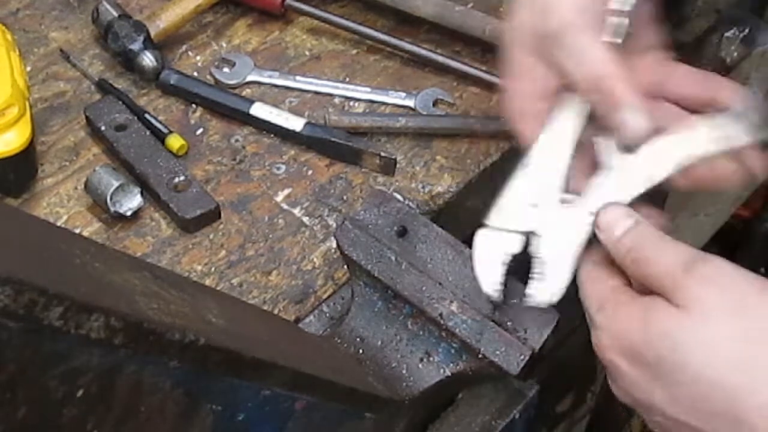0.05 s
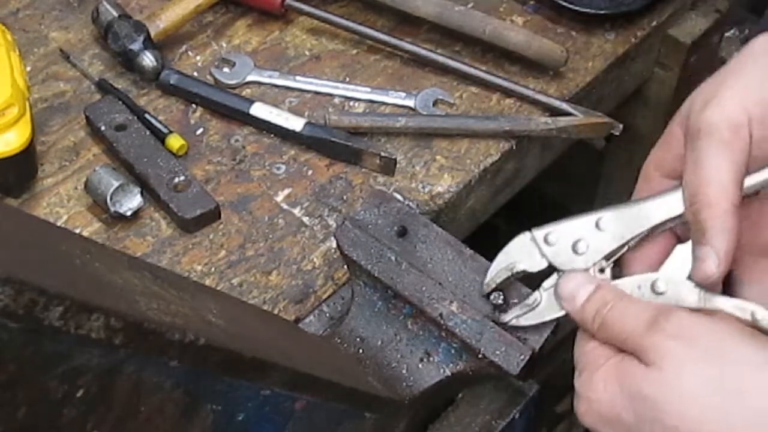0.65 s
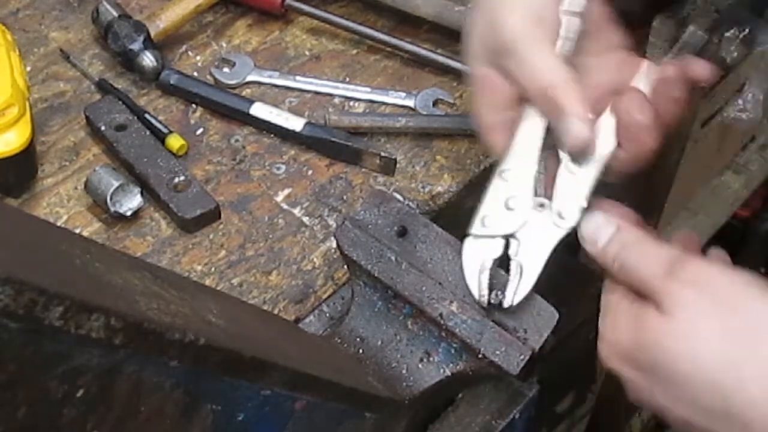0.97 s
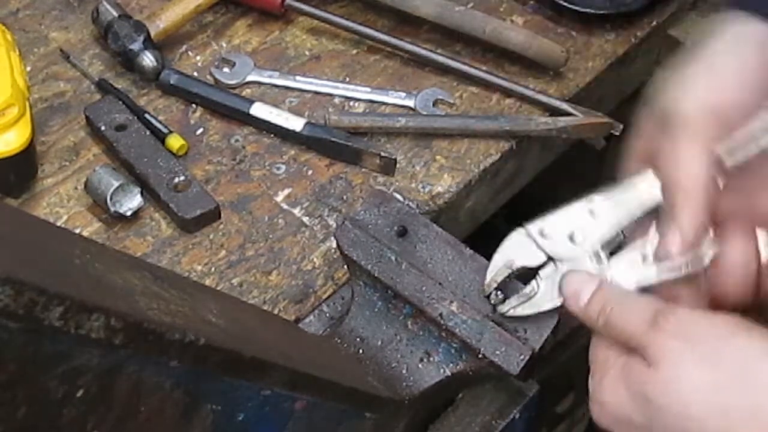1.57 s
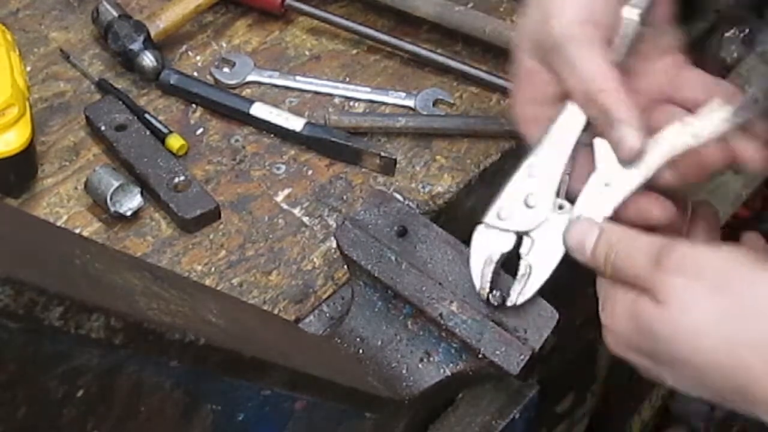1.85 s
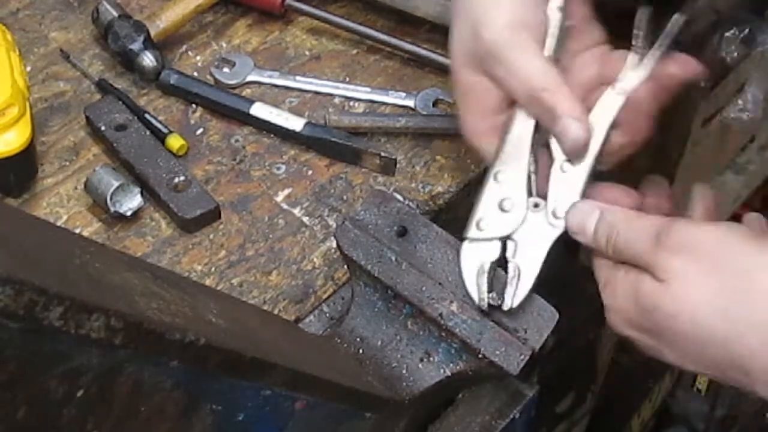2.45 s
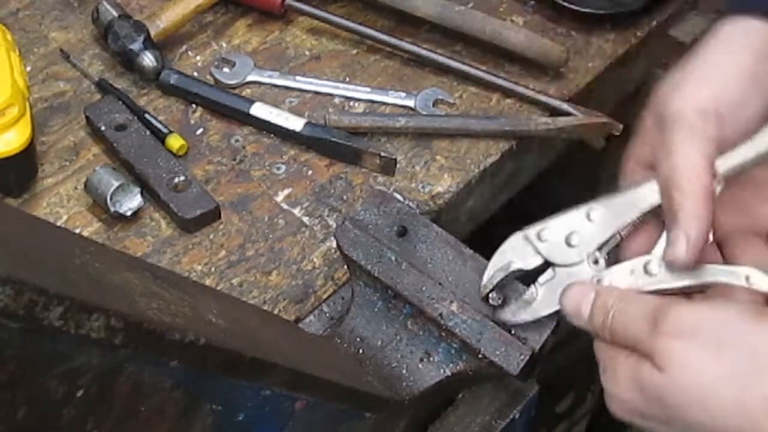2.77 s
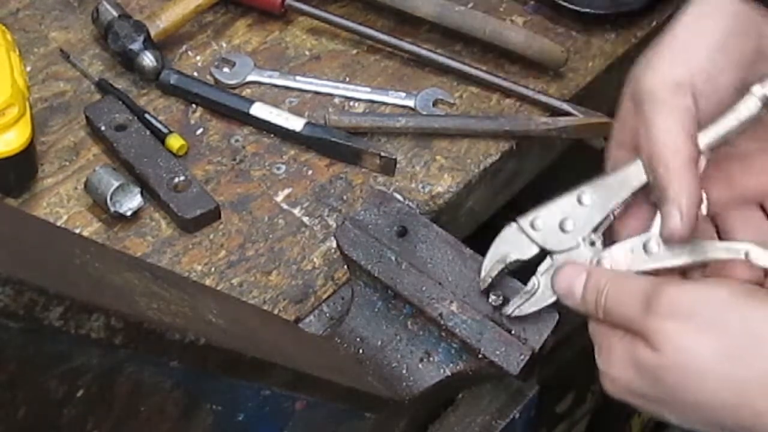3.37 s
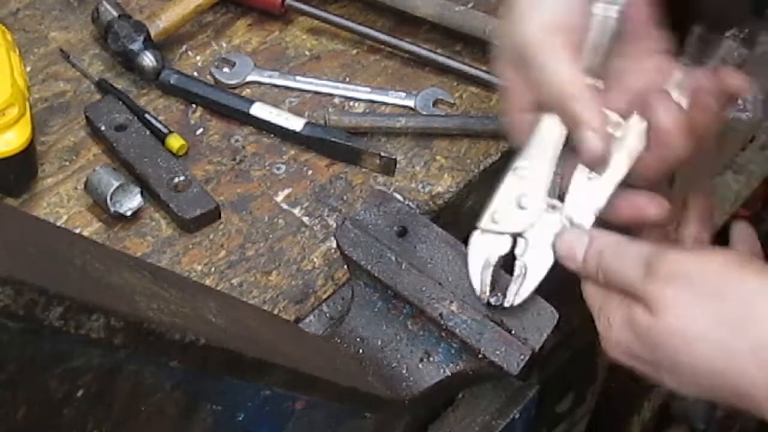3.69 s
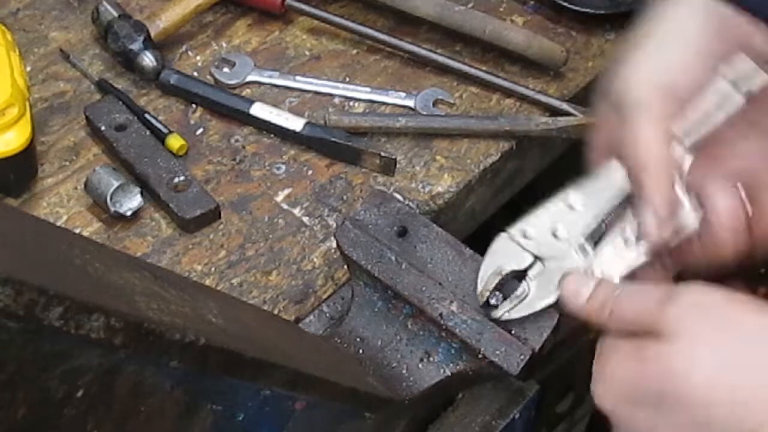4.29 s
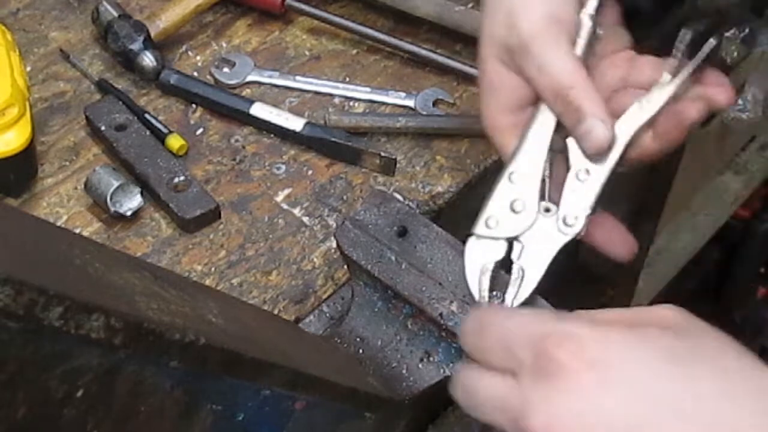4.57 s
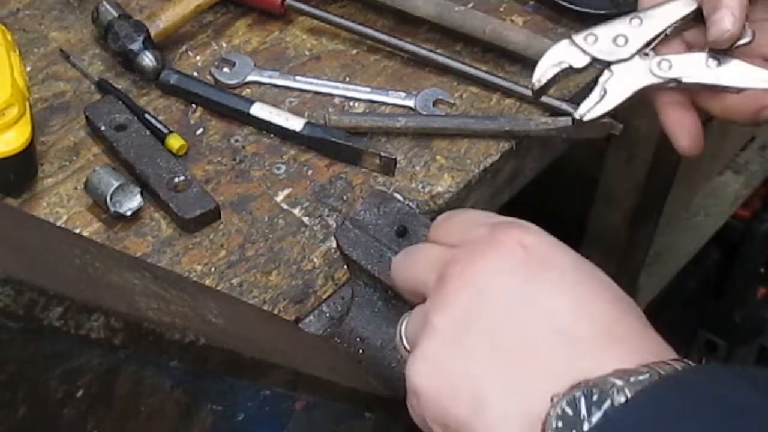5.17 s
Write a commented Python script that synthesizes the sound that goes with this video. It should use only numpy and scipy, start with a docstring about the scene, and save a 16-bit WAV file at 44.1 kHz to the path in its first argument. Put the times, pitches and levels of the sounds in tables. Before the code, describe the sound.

Steel locking pliers work a broken screw stub held in an iron vice, close to the microphone in a small workshop. The loose lever clicks at the end of each stroke and the jaws clack as they are reset, with faint scraping and dull knocks through the wooden bench. A few very faint squeaks come late, then a sharp ringing snap and a last click give way to quiet room tone.

```python
"""Locking pliers work a broken screw stub out of a cast-iron vice, close to a camera microphone in a
small workshop. Each stroke ends in a click of the loose lever; then the jaws are set again and the
toggle snaps. The teeth scrape over the stub, the vice knocks on the wooden bench, and the steel
squeaks faintly as it turns. The camera's gain control ducks at the loudest, sharpest clicks and lets
the room noise swell back."""
import sys
import numpy as np
from scipy import signal
from scipy.fft import rfft, irfft
from scipy.io import wavfile
from scipy.ndimage import uniform_filter1d

SR = 44100
rng = np.random.default_rng(int(sys.argv[2]) if len(sys.argv) > 2 else 0)


def to_wav(sig):
    """Store sig (one row per channel, or 1-D mono) as 16-bit WAV at the path in sys.argv[1].

    Samples outside -1..1 are clipped; the rate is SR.
    """
    pcm = np.clip(np.atleast_2d(sig), -1, 1) * 32767
    pcm = np.round(pcm).astype(np.int16)
    wavfile.write(sys.argv[1], SR, pcm.T)  # frames by channels


N = 239594
T = np.arange(int(.36 * SR)) / SR  # time within one impact [s]

# the pliers reach the end of a turn and the lever drops loose: (time [s], level [dB])
STROKE_ENDS = [(0.134, -23.5), (0.9556, -27), (1.6972, -29), (2.3718, -28.5), (3.0579, -22), (3.7305, -27),
               (4.415, -26.5)]
# shoves that reach the bench through the vice: (time [s], level [dB], tilt [dB/octave])
SHOVES = [(0.014, -43, -3.5), (0.225, -38, 1), (0.569, -30.5, -3), (0.589, -31.5, -1), (0.921, -36.5, 1),
          (1.125, -36.5, -4), (1.216, -29, -2.5), (1.262, -37.5, -3), (1.393, -39.5, -9.5),
          (1.43, -30, 0.5), (1.855, -42.5, -7.5), (1.968, -44, -8), (2.111, -30.5, -0.5), (2.367, -38.5, 1),
          (2.542, -38.5, -5), (2.59, -35.5, 11.5), (2.67, -25, -2.5), (2.826, -23.5, 2), (3.025, -40, 5.5),
          (3.196, -40.5, -2.5), (3.228, -41, -6), (3.284, -33.5, 7), (3.471, -30, -1), (3.856, -43, -4.5),
          (4.02, -32.5, -4.5), (4.137, -45, -1.5), (4.228, -31, 1.5), (4.581, -33.5, -4.5),
          (4.595, -30.5, -7), (4.716, -36, -4.5)]


def pliers(stroke_hz=6590, touch_hz=3560, touch_db=-7.5, rebound_db=-18):
    """The pliers click as the jaws are set, as a stroke ends and, more dully, as a shove begins."""
    # steel meets steel as the jaws are set again: (time [s], level [dB], contact centre [Hz])
    jaw_clicks = [(0.017, -40, 3960), (0.024, -35, 2800), (0.117, -44.5, 5300), (0.742, -34, 5130),
                  (0.7542, -11.5, 2290), (0.7569, -14.5, 6950), (0.78, -24.5, 6360), (1.171, -39, 5500),
                  (1.2158, -27.5, 3600), (1.3373, -32.5, 6850), (1.397, -33, 2800), (1.4052, -35, 5030),
                  (1.43, -32.5, 3650), (1.5757, -39, 4870), (1.933, -44, 4100), (2.09, -22, 6300),
                  (2.12, -27, 4630), (2.161, -34.5, 5000), (2.4346, -38, 5500), (2.5434, -30, 3060),
                  (2.5912, -30.5, 1980), (2.624, -37.5, 3940), (2.64, -42, 5200), (2.67, -19, 3800),
                  (2.7402, -28, 6450), (2.768, -33, 6270), (2.8294, -17.5, 3540), (2.844, -38, 5230),
                  (2.8876, -21.5, 6160), (2.8922, -28, 5700), (3.033, -33, 4940), (3.2355, -39, 6040),
                  (3.265, -41, 5500), (3.287, -34, 2500), (3.424, -39.5, 6000), (3.4527, -19, 7200),
                  (3.4722, -27.5, 4400), (3.7982, -41, 5300), (3.871, -35, 3740), (3.954, -43, 5200),
                  (4.022, -35, 2980), (4.102, -38.5, 6130), (4.2135, -16, 7160), (4.2353, -19.5, 5700),
                  (4.248, -23, 6270), (4.2881, -16, 7100), (4.7125, -30.5, 5200), (4.7467, -34, 5660),
                  (4.8265, -24.5, 7000), (4.849, -21, 5150), (4.855, -16.5, 4700), (4.8613, -6.5, 8200),
                  (4.9847, -23, 6750)]
    contacts = [(s, click(db, hz)) for s, db, hz in jaw_clicks]
    contacts += [(s, click(db, stroke_hz, ring_db=-7.5)) for s, db in STROKE_ENDS]
    contacts += [(s, click(db + touch_db, touch_hz)) for s, db, _ in SHOVES]
    out = np.zeros(N)
    for s, sound in contacts:
        add(out, s, sound)
        rebound_s = .015 + .04 * rng.random()  # play in the joints
        add(out, s + rebound_s, undb(rebound_db) * sound)
    return out


def click(db, hz, ring_db=-10, neutral_hz=6700, spread=1.588):
    """A short crack of contact and its ring; the harder the contact, the brighter both."""
    crack = unit(burst(hz, spread, t60=.0083), .002)
    tilt_db = 9.5 * np.log2(hz / neutral_hz)
    return undb(db) * (crack + undb(ring_db) * steel_ring(tilt_db))


def steel_ring(tilt_db, modes_db=0, room_db=-7, pivot_hz=3000):
    """Steel modes, struck at a new spot each time, in a wash of reflections from bench and walls."""
    # modes of pliers and vice: (frequency [Hz], level [dB], t60 [s])
    steel_modes = [(1222, -3, 0.066), (1488, -3, 0.052), (2140, -6, 0.094), (2586, -5, 0.11),
                   (2661, -2.5, 0.085), (3210, -7.5, 0.1), (3740, -18, 0.14), (3760, -8.5, 0.11),
                   (4700, -39, .13), (4570, 1, 0.028), (5330, 4.5, 0.062), (5770, 1, 0.062),
                   (5900, -19, 0.14), (7000, -37, .14), (7510, -2, 0.1), (9240, -5, 0.11),
                   (11500, -27, .08), (14500, -9, 0.11)]
    # broad spectrum of the wash: (frequency [Hz], level [dB])
    clatter = [(150, -25), (600, 1.5), (1500, -6.5), (2700, 1.5), (4000, -1), (5500, -1), (9000, -2.5),
               (10500, -7.5), (13000, -11), (14400, -12), (16000, -38)]
    # clusters of close, quickly damped modes in the pliers: (frequency [Hz], width [Hz], gain [dB])
    clusters = [(2600, 270, -0.5), (4960, 250, 7), (8700, 260, 7), (14350, 400, 1)]
    hz, db, t60 = np.transpose(steel_modes)
    strength, detune, phase = rng.standard_normal((len(hz), 3)).T
    hz = hz * (1 + .002 * detune)
    # a soft touch leaves the high modes quiet
    gain = undb(db + 2.5 * strength + min(tilt_db, 0) * np.log2(np.maximum(hz / pivot_hz, 1)))
    modes = sum(g * fade(d) * np.sin(2 * np.pi * f * T + np.pi * p)
                for g, d, f, p in zip(gain, t60, hz, phase))
    colour = [(f, level + tilt_db * np.log2(max(f / pivot_hz, 1))) for f, level in clatter]
    wash = noise(len(T), colour, peaks=clusters) * (fade(.14) + undb(room_db) * fade(.13))
    return unit(unit(wash, .022) + undb(modes_db) * unit(modes, .022), .022)


def toggle_snaps(t60=.023, width_octaves=.59):
    """The toggle strikes the lever and rings the modes near the centre frequency of the blow."""
    # the toggle snaps over: (time [s], level [dB], centre [Hz])
    blows = [(0.754, -12.5, 2420), (4.747, -34, 4500), (4.826, -30, 3470), (4.849, -18.5, 5100)]
    # modes of the lever, damped by the hand: (frequency [Hz], level [dB])
    lever_modes = [(1410, -5), (2000, -0.5), (2300, -1.5), (3110, -4.5), (3370, -10), (3900, 5.5),
                   (4840, 2.5)]
    out = np.zeros(N)
    for s, db, centre_hz in blows:
        for hz, mode_db in lever_modes:
            share = np.exp(-.5 * (np.log2(hz / centre_hz) / width_octaves) ** 2)
            add(out, s, undb(db + mode_db) * share * fade(t60) * np.sin(2 * np.pi * hz * T))
    return out


def pings(t60=.11):
    """Lone partials of jaw, lever and spring sing on after a blow."""
    # struck partials: (time [s], frequency [Hz], level [dB])
    partials = [(0.758, 14350, -29), (0.759, 5320, -23.5), (2.12, 9240, -35.5), (2.641, 7940, -48),
                (2.676, 9380, -29.5), (2.83, 3130, -29), (2.829, 6150, -29), (2.829, 14260, -32.5),
                (2.891, 5290, -32.5), (3.286, 1440, -26), (3.287, 1866, -29.5), (3.285, 3200, -31.5),
                (3.731, 4880, -37), (4.418, 2620, -28), (4.828, 7750, -33), (4.8545, 3470, -11.5)]
    out = np.zeros(N)
    for s, hz, db in partials:
        add(out, s, undb(db) * fade(t60) * np.sin(2 * np.pi * hz * T))
    return out


def scraping(slips_per_s=160, spread_db=4):
    """Teeth slip over the stub in tiny uneven steps, each ringing the steel."""
    # drags of the jaws: (time [s], length [s], level [dB])
    drags = [(0.579, 0.11, -65), (1.106, 0.25, -54), (1.682, 0.017, -45.5), (1.833, 0.41, -59.5),
             (2.588, 0.18, -52), (2.802, 0.062, -36), (3.189, 0.17, -54), (3.833, 0.46, -56.5)]
    out = np.zeros(N)
    for s, length, db in drags:
        size = int(length * SR)
        slips = rng.random(N) < slips_per_s / SR
        strength = undb(spread_db * np.minimum(rng.exponential(size=N), 4))
        force = (slips * strength)[:size] * np.sin(np.linspace(0, np.pi, size))
        rasp = signal.fftconvolve(force, steel_ring(tilt_db=-7, modes_db=-7.5))
        add(out, s, undb(db) * unit(rasp, length))
    return out


def bench_knocks(stroke_db=-23, stroke_tilt_db=6.5, room_db=-12, rise_s=.00069):
    """Knocks spread through the bench top as bending waves: the highs arrive first, the lows trail."""
    # broad response of the wood: (frequency [Hz], level [dB])
    wood = [(50, -33), (120, -13), (250, -8.5), (550, -4), (850, -6.5), (1350, -2), (1700, -16.5),
            (2800, -19.5), (4200, -38), (9000, -76)]
    # resonances of the bench with the vice on it: (frequency [Hz], width [Hz], gain [dB])
    resonances = [(150, 8.5, -1), (247.4, 21.3, 16), (384, 23, 10.5), (404, 31, 7), (553.7, 19.3, 19),
                  (608, 22, 13), (798.7, 47, 18), (896, 116, 8.5), (1309, 27, 9.5), (1481, 38, 12.5),
                  (1903, 180, 13), (2583, 37, 17.5)]
    size = 2 * len(T)
    khz = np.fft.rfftfreq(size, 1 / SR) / 1000
    lag_s = .006 * np.maximum(np.maximum(khz, .15) ** -.5 - .5, 0)
    dispersion = np.exp(-2j * np.pi * np.cumsum(lag_s) * SR / size)
    envelope = (fade(.14) + undb(room_db) * fade(.32)) * (1 - np.exp(-T / rise_s))
    stroke_knocks = [(s, db + stroke_db, stroke_tilt_db) for s, db in STROKE_ENDS]
    out = np.zeros(N)
    for s, db, tilt_db in list(SHOVES) + stroke_knocks:
        thud = noise(len(T), wood, tilt_db, resonances) * envelope
        knock = irfft(rfft(thud, size) * dispersion)
        add(out, s, undb(db) * unit(knock, .04))
    return out


def bench_sway(sway_db=-30.5):
    """The whole bench sways briefly on its legs at the end of each stroke."""
    out = np.zeros(N)
    for s, db in STROKE_ENDS:
        boom = burst(hz=78, spread=1.1, t60=.1)
        add(out, s, undb(db + sway_db) * unit(boom, .08))
    return out


def squeaks(waver=.0058):
    """A thin stick-slip whistle that sinks as the turn slows."""
    # dry steel turning under load: (time [s], length [s], start [Hz], end [Hz], level [dB])
    turns = [(3.748, 0.14, 7150, 7000, -63), (3.945, 0.13, 7240, 6900, -62),
             (4.123, .09, 7100, 6700, -61.5), (4.286, 0.11, 7250, 6450, -63)]
    out = np.zeros(N)
    for s, length, start_hz, end_hz, db in turns:
        progress = np.linspace(0, 1, int(length * SR))
        wander = uniform_filter1d(rng.standard_normal((2, len(T))), size=150)
        slip, grip = (w[:len(progress)] / w.std() for w in wander)
        hz = (start_hz + (end_hz - start_hz) * progress ** 2) * (1 + waver * slip)
        envelope = 2 * np.sin(np.pi * progress) * (1 + .5 * grip)
        add(out, s, undb(db) * envelope * np.sin(2 * np.pi * np.cumsum(hz) / SR))
    return out


def room_tone(db=-49.5):
    """The steady air of the workshop, behind the work at the bench."""
    # spectrum of the room: (frequency [Hz], level [dB])
    air = [(18, -43), (30, -6), (124, -7), (245, -5.5), (328, -6.5), (649, -6.5), (740, -7), (1280, -12),
           (2060, -12.5), (2610, -15.5), (3670, -19.5), (4650, -21), (7090, -25), (16000, -41)]
    return undb(db) * noise(N, air)


def ducking(x, threshold_db=-34, sense_hz=7000, window_s=.0021, recover_s=.31):
    """The camera's gain reduction in dB: jumps when the treble passes the threshold, then relaxes."""
    treble = signal.sosfilt(signal.butter(3, sense_hz, "high", fs=SR, output="sos"), x)
    power = np.maximum(uniform_filter1d(treble ** 2, int(window_s * SR)), 1e-12)
    over_db = np.maximum(10 * np.log10(power) - threshold_db, 0)
    relax = np.exp(-np.arange(N) / SR / recover_s)
    return np.maximum.accumulate(over_db / relax) * relax


def undb(db):
    """Decibels to gain."""
    return 10 ** (np.asarray(db) / 20)


def fade(t60):
    """Decay that loses 60 dB in t60 seconds."""
    return np.exp(-np.log(1000) * T / t60)


def unit(x, seconds):
    """Scale to rms 1 over the first seconds."""
    return x / np.sqrt(np.mean(x[:int(seconds * SR)] ** 2))


def add(track, s, sound):
    """Mix a sound in at time s."""
    i = max(int(s * SR), 0)
    track[i:i + len(sound)] += sound[:N - i]


def burst(hz, spread, t60):
    """Decaying noise, band-passed from hz / spread to hz * spread."""
    band = signal.butter(2, [hz / spread, min(hz * spread, .47 * SR)], "band", fs=SR, output="sos")
    return signal.sosfilt(band, rng.standard_normal(len(T)) * fade(t60))


def noise(size, points, tilt_db=0, peaks=()):
    """Noise of rms 1 with a spectrum of (Hz, dB) points, a tilt per octave and resonant peaks."""
    f = np.maximum(np.fft.rfftfreq(size, 1 / SR), 1)
    hz, db = np.transpose(points)
    gain = undb(np.interp(np.log(f), np.log(hz), db) + tilt_db * np.log2(np.clip(f, hz[1], hz[-1])))
    gain *= 1 + sum((undb(peak_db) - 1) / (1 + (2 * (f - centre) / width) ** 2)
                    for centre, width, peak_db in peaks)
    x = irfft(gain * rfft(rng.standard_normal(size)), size)
    return x / x.std()


def scene():
    """Pliers, vice and bench sit close and straight ahead of the microphone, over the room tone."""
    steel = pliers() + toggle_snaps() + pings() + scraping()
    mid = steel + bench_knocks() + bench_sway() + squeaks() + room_tone()
    return np.array([mid, mid])


def record(dry, thump_hz=260, hiss_db=-67, port_hiss_db=-68, ports_hz=3500, top_hz=15800, offset=.006):
    """The camera microphone: gain control with a soft thump at each drop, hiss and a steep top cut."""
    duck_db = ducking(dry[0])
    drops = np.maximum(np.diff(duck_db, prepend=duck_db[0]), 0)
    thump = .095 * signal.sosfilt(signal.butter(1, thump_hz, fs=SR, output="sos"), drops)
    sound = dry * undb(-duck_db) + thump
    preamp_hiss = undb(hiss_db) * noise(N, [(50, -30), (500, -16), (3000, 7.5), (16000, 1.5)])
    # the two ports differ mainly in the treble: each has its own hiss and hears short waves a bit apart
    port_hiss = noise(N, [(100, -18), (2200, -36.5), (5000, -16.5), (8000, -14), (16000, -13)])
    treble = signal.sosfiltfilt(signal.butter(1, ports_hz, "high", fs=SR, output="sos"), sound[0])
    side = undb(port_hiss_db) * port_hiss + undb(-15) * np.gradient(treble)
    stereo = sound + preamp_hiss + side * np.array([[1], [-1]])
    return offset + signal.sosfilt(signal.ellip(8, .2, 70, top_hz, fs=SR, output="sos"), stereo)


dry = scene()
out = record(dry)
to_wav(out)
```